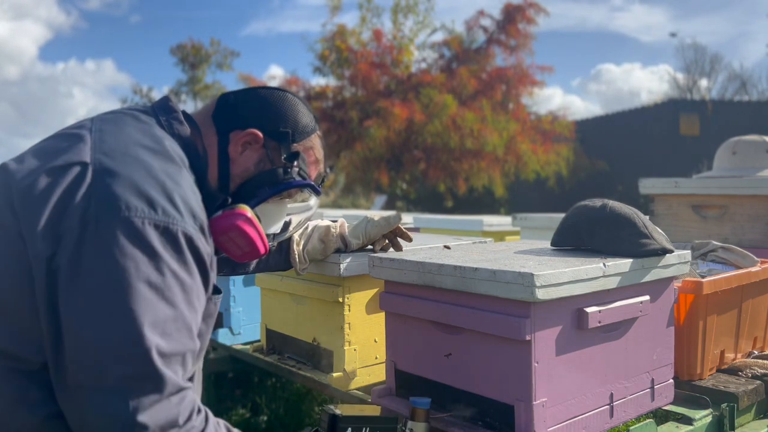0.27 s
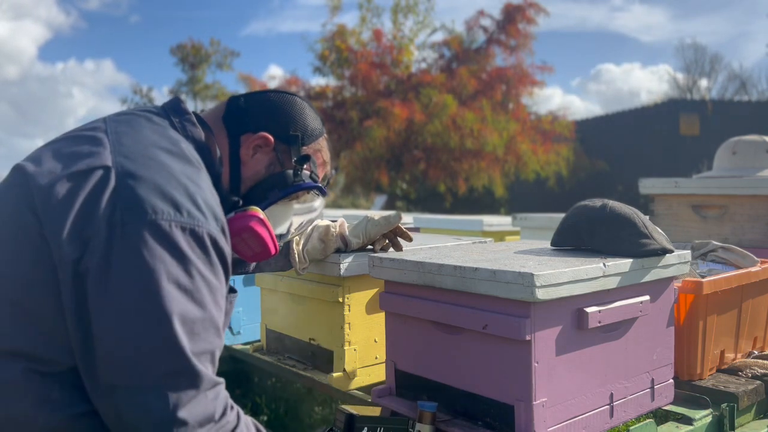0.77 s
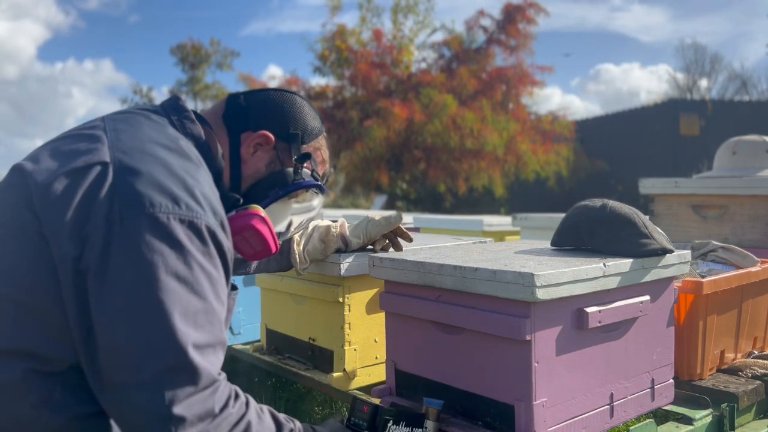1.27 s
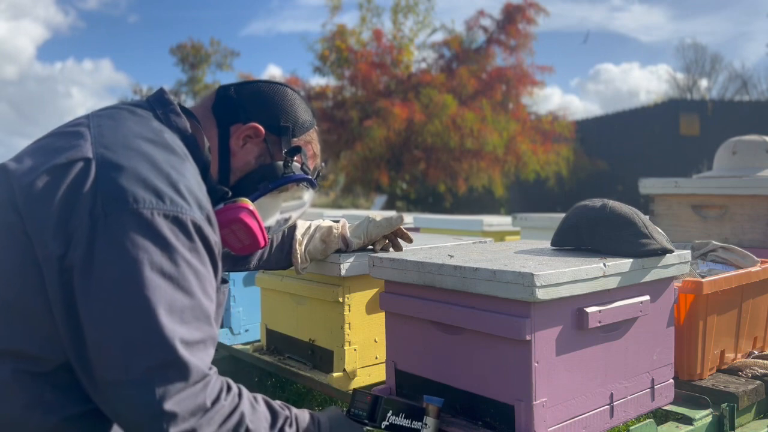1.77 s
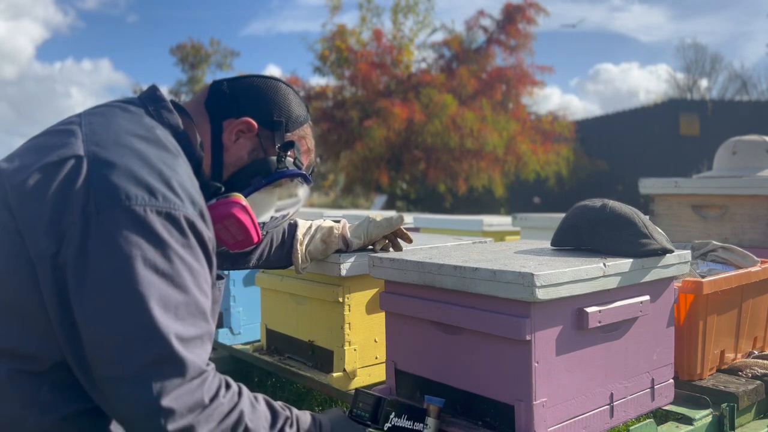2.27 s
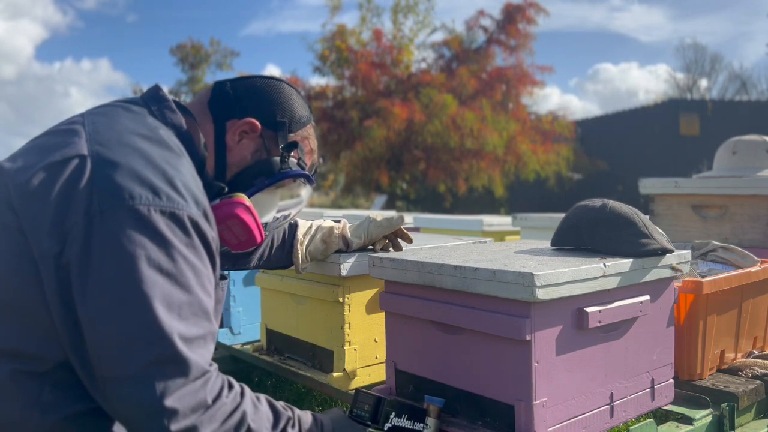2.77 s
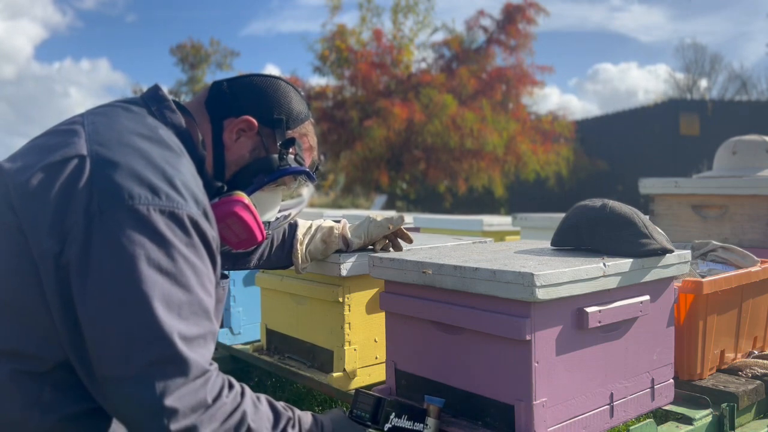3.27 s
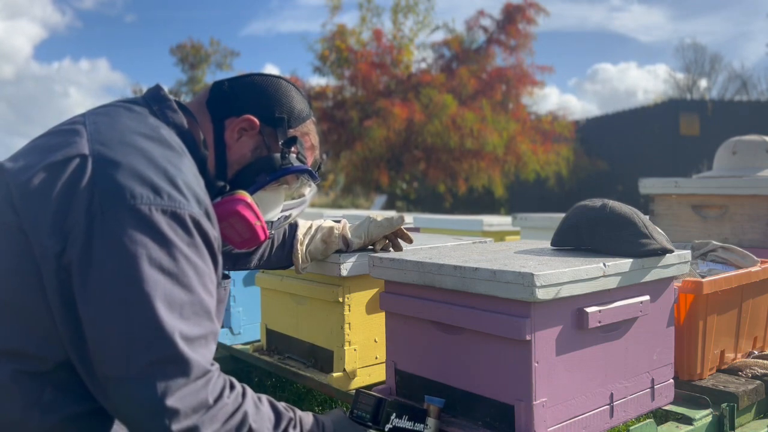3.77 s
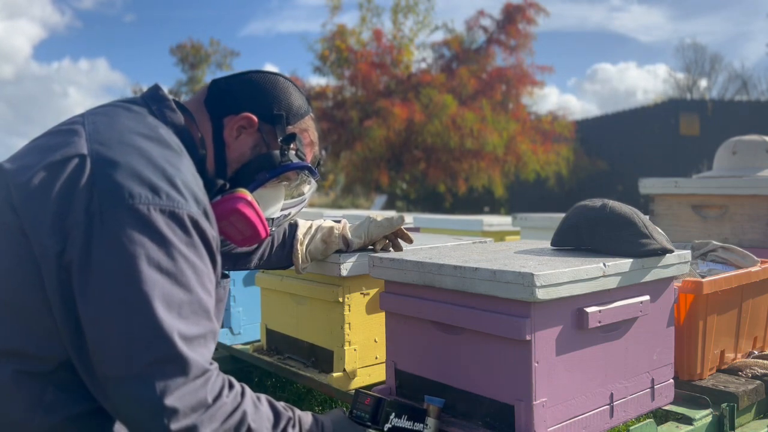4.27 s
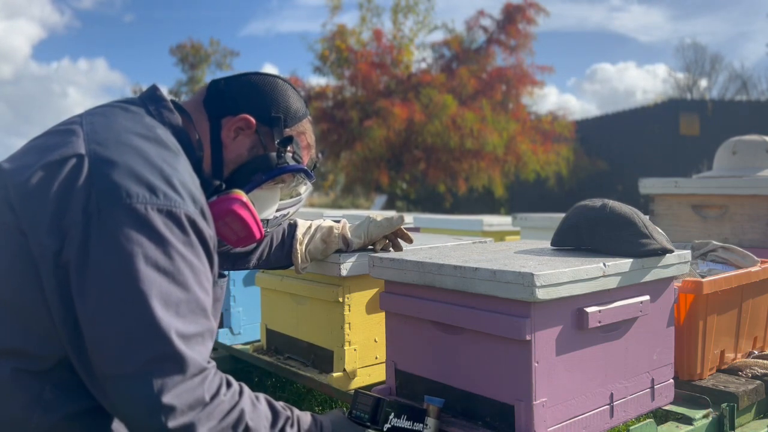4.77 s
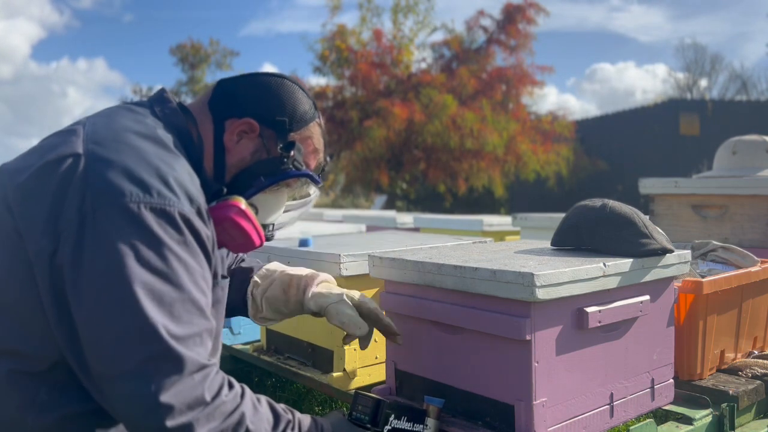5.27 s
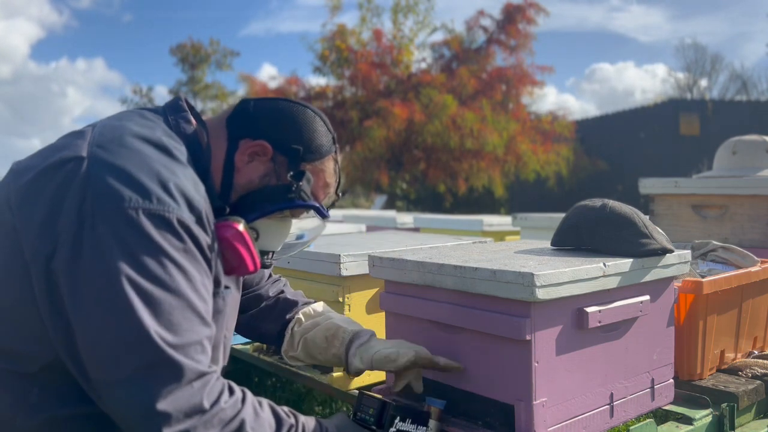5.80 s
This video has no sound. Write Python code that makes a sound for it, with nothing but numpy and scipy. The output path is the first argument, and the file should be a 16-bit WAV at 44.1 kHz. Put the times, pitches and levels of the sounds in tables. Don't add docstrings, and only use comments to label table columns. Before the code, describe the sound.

Bees hum low and waver among wooden hives while a cricket trills, a bird whistles, and hard hollow knocks hit a box near the end.

```python
import sys
import numpy as np
from scipy import signal
from scipy.fft import rfft, irfft, next_fast_len
from scipy.io import wavfile

SR = 44100
rng = np.random.default_rng(int(sys.argv[2]) if len(sys.argv) > 2 else 0)


def magnitude_from_level(level_db):
    exponent = np.asarray(level_db, float) / 20
    return 10 ** exponent


def generate_wav(sig):
    pcm = np.round(np.clip(np.atleast_2d(sig).T, -1, 1) * 32767).astype(np.int16)
    wavfile.write(sys.argv[1], SR, pcm)


N = 266231
T = np.arange(N) / SR

# frequency in Hz, level in dB, 60 dB decay in seconds.
LID_MODES = [(165.7, -8, 0.32), (270, 16, 0.018), (346, 6, 0.061), (420, -5, 0.083), (595, -5, 0.048),
             (975, -1.5, 0.03), (1700, -29, 0.018), (2300, -4.5, 0.0097)]
WALL_MODES = [(165.3, -11, 0.2), (239, 0.5, 0.06), (315.5, -15.5, 0.14), (456, -2.5, 0.035),
              (572, 8, 0.018), (773, -0.5, 0.017), (1080, 2, 0.012), (1393, 5, 0.013), (1840, -6, 0.009),
              (2400, 12, 0.0024), (4100, -0.5, 0.0081)]
FRONT_MODES = [(164, -12.5, 0.12), (242, -2, 0.062), (328, -11, 0.075), (487, -9, 0.014), (767, -8, 0.023),
               (1135, -9, 0.032), (1320, 12.5, 0.0085), (1780, 9.5, 0.007), (2284, -12, 0.021),
               (2590, -14, 0.017), (582, -12, 0.04)]
# start in seconds, level in dB, crack in dB, contact in ms, rattle in dB.
LID_BLOWS = [
    (.7615, -37, -42, 0.7, -5.5),
    (.766, -30, -50, 0.49, -11),
]
WALL_BLOWS = [
    (5.589, -47, -5, 1, 6.5),
    (5.6165, -29.5, -6, 0.6, 5),
    (5.619, -18.5, -15.5, 0.071, -9),
    (5.6225, -41, 5, 0.15, -18),
    (5.757, -34, -20, 0.85, -3.5),
]
FRONT_BLOWS = [
    (5.8338, -12, -15, 0.33, -9.5),
    (5.8448, -34.5, 3, 0.26, -22),
]
# start in seconds, end in seconds, level in dB, centre in Hz, grit in dB.
SCUFFS = [
    (5.57, 5.609, -66, 1190, 8),
    (5.723, 5.776, -55, 1300, -30),
    (5.791, 5.833, -46.5, 1380, -29),
    (5.808, 5.825, -54, 2200, 7),
    (5.663, 5.704, -53.5, 1130, -16),
    (5.851, 5.96, -59.5, 1250, -10),
]
# middle in seconds, level in dB, pitch in Hz, length in seconds.
TAPS = [
    (0.166, -55, 700, 0.0091),
    (0.243, -53.5, 676, 0.032),
    (0.789, -49, 355, 0.0089),
    (0.821, -43, 320, 0.015),
    (0.805, -58, 1670, 0.022),
    (1.199, -47, 420, 0.026),
    (1.206, -49, 260, 0.033),
    (1.381, -44, 267, 0.044),
    (5.768, -40.5, 617, 0.025),
]
# time in seconds, effort in dB.
EFFORT = [(0.0, -8.5), (0.6, -3.5), (1.7, -8), (2.3, 4.5), (2.8, -3), (3.7, 1.5), (4.15, 5.5), (4.6, -5),
          (5.0, 13.5), (5.4, -10.5), (6.04, -14.5)]
# wing beat in Hz, spread as a share, levels of overtones 1 to 3 in dB.
FLYING = [
    (203, .035, -8, -4, -22),
    (240, .05, -8, -16, -26),
]
# time in seconds, level in dB.
CRICKET_LEVEL = [(0.0, -66.5), (0.82, -66), (1.8, -64), (2.5, -63.5), (4.62, -66.5), (6.04, -66)]
# centre in Hz, width in Hz, level in dB.
CRICKET_WING = [(6760, 1600, 3), (6950, 180, -2.5), (6500, 260, -3)]
# start in seconds, length in seconds, first Hz, last Hz, level in dB.
WHISTLES = [(0.336, .02, 2320, 2150, -64), (1.372, .062, 2660, 2150, -61), (1.448, .03, 2740, 2620, -63),
            (1.565, .125, 2540, 2290, -61), (1.7, .024, 2800, 2500, -63), (1.912, .074, 2270, 2120, -61.5),
            (4.76, .036, 2330, 2110, -64), (0.377, .023, 3860, 3800, -73), (0.814, .02, 3800, 3780, -75),
            (1.787, .022, 3800, 3600, -72), (2.362, .022, 3900, 3630, -72.5)]
# start in seconds, spacing in seconds, number of sweeps.
TRILL = [
    (2.395, .0155, 4),
    (2.459, .0182, 7),
    (2.592, .018, 1),
    (2.615, .0179, 6),
    (2.727, .018, 1),
]
# time in seconds, level in dB.
RUMBLE = [(0.0, -56.5), (1.1, -48.5), (1.6, -59.5), (2.15, -48.5), (3.0, -52.5), (4.0, -54.5), (4.8, -62),
          (5.5, -57.5), (6.04, -37)]
# frequency in Hz, dB per Hz.
AIR_MID = [(22, -35), (34, -18), (48, -4), (70, -0.5), (110, -4), (160, -11.5), (420, -15.5), (560, -22),
           (1500, -27), (2700, -33.5), (5400, -35.5), (9000, -45), (12000, -58), (16000, -50.5)]
AIR_SIDE = [(15, -43), (25, -10), (102, -4.5), (285, -12.5), (405, -7), (1560, -14), (3920, -23),
            (6920, -22.5), (8360, -35), (10700, -35.5), (11900, -45), (14400, -37.5), (16000, -36)]
# low edge in Hz, high edge in Hz.
MID_GAPS = [(9700, 10950), (13050, 14450), (15750, 22050)]
SIDE_GAPS = [(10950, 13050), (14450, 22050)]


def walk(rate):
    knots = rng.standard_normal(int(rate * N / SR) + 3)
    step, share = np.divmod(T * rate, 1)
    step = step.astype(int)
    share = share ** 2 * (3 - 2 * share)
    return 1.15 * (knots[step] * (1 - share) + knots[step + 1] * share)


def unit(x):
    return x / np.sqrt(np.mean(x ** 2))


def resonate(x, hz, width):
    return signal.lfilter(*signal.iirpeak(hz, hz / width, fs=SR), x)


def butter(x, order, hz, kind="lowpass"):
    return signal.sosfilt(signal.butter(order, hz, kind, fs=SR, output="sos"), x)


def curve(table):
    return np.interp(T, *np.transpose(table))


def tone(hz):
    return np.sin(2 * np.pi * np.cumsum(hz) / SR)


def place(x, pan_db, lag):
    return np.array([np.roll(x, int(lag)) * magnitude_from_level(pan_db / 2), x * magnitude_from_level(-pan_db / 2)])


def board_ring(modes, late_s, contact_ms, t):
    ring = 0
    for k, (hz, db, t60) in enumerate(modes):
        u = np.clip(t - late_s * 200 / hz, 0, None)
        decay = np.exp(-np.log(1000) * u / t60)
        build_up = 1 - np.exp(-.9 * hz * u)
        ring = ring + (-1) ** k * magnitude_from_level(db) * np.sin(2 * np.pi * hz * u) * decay * build_up
    push = np.exp(-t[:300] / (contact_ms * 1e-3 / 4))
    return signal.fftconvolve(ring, push / push.sum())[:len(t)]


def knocks(blows, modes, late_s, pan_db):
    out, t = np.zeros((2, N + SR)), T[:SR // 5]
    for start, db, crack_db, contact_ms, rattle_db in blows:
        ring = board_ring(modes, late_s, contact_ms, t)
        grit = rng.standard_normal((4, len(t)))
        rattle = resonate(resonate(resonate(grit[3], 570, 890), 670, 2600), 680, 3300)
        rattle = 3 * rattle * np.exp(-t / 0.011)
        fade = np.exp(-(t / .003) ** 1.5) + magnitude_from_level(-36) * np.exp(-t / .03)
        crack = resonate(.7 * grit[0] + grit[1:3], 5500, 10000) * fade
        blow = place(ring + magnitude_from_level(rattle_db) * rattle, pan_db, 2.4) + magnitude_from_level(crack_db) * crack
        i = int(start * SR)
        out[:, i:i + len(t)] += magnitude_from_level(db) * blow
    return butter(out[:, :N], 4, [140, 15800], "bandpass")


def scuffs():
    out, grain = np.zeros((2, N)), magnitude_from_level(1.6 * walk(390))
    for start, end, db, hz, grit_db in SCUFFS:
        i, n = int(start * SR), int((end - start) * SR)
        noise = rng.standard_normal((3, n))
        body = resonate(resonate(noise[0], hz, 0.77 * hz), hz, 3 * hz)
        rub = place(unit(body), -.5, 3.4) + magnitude_from_level(grit_db) * resonate(noise[1:], 6000, 8000)
        out[:, i:i + n] += magnitude_from_level(db) * np.hanning(n) * rub
    return out * grain


def taps():
    out, u = np.zeros(N), T[:6000] - T[3000]
    for start, db, hz, span in TAPS:
        i = int(start * SR) - 3000
        swell = np.exp(-(u / (0.23 * span)) ** 2)
        out[i:i + len(u)] += magnitude_from_level(db) * swell * np.sin(2 * np.pi * hz * u)
    return place(out, 2.0, 0)


def wingbeat(hz, spread):
    return 2 * np.pi * np.cumsum(hz * (1 + spread * walk(1.6) + 0.69 * spread * walk(20))) / SR


def bees(count=3):
    effort_db = curve(EFFORT)
    fan_db, third_db = -62.5 + effort_db, -64 + 0.2 * effort_db
    fly_db = -70 - 0.71 * effort_db
    out = 0
    for _ in range(count):
        phase = wingbeat(106, .02)
        wing = magnitude_from_level(fan_db) * np.sin(phase) + magnitude_from_level(third_db) * np.sin(3 * phase)
        out = out + place(wing * magnitude_from_level(1.72 * walk(10)), 2.9, 0)
        for hz, spread, *overtones in FLYING:
            phase = wingbeat(hz, spread)
            wing = sum(magnitude_from_level(db) * np.sin((k + 1) * phase) for k, db in enumerate(overtones))
            out = out + place(wing * magnitude_from_level(fly_db + 3.4 * walk(8)), 1.2 + 2.3 * walk(1), 0)
    return out * np.sqrt(2 / count)


def cricket():
    strokes_hz = 61.5 * (1 + 0.0076 * walk(6.3))
    turn = np.cumsum(strokes_hz) / SR % 1
    chirp = tone(7000 - 1050 * (turn - .5) + 120 * walk(40))
    roughness = (2.1 + walk(500)) * magnitude_from_level(2.6 * walk(6.7))
    near = unit(np.sin(np.pi * turn) ** 2 * chirp * roughness)
    rasp = rng.standard_normal((2, N))
    far = unit(sum(magnitude_from_level(db) * resonate(resonate(rasp, hz, width), hz, width) for hz, width, db in CRICKET_WING))
    song = magnitude_from_level(-8.5) * place(near, 17.0, -16) + far * magnitude_from_level([[1.5], [-7]])
    return butter(magnitude_from_level(curve(CRICKET_LEVEL)) * song, 8, 9000)


def whistles(waver):
    song = np.zeros(N)
    attack_s, release_s, hook_s, hook_hz = .008, .005, .012, 110
    for start, span, first_hz, last_hz, db in WHISTLES:
        left_s = start + span - T
        done = np.clip((T - start) / span, 0, 1)
        edge = np.clip(np.minimum((T - start) / attack_s, left_s / release_s) + .5, 0, 1)
        hook = hook_hz * np.clip(1 - left_s / hook_s, 0, 1) * (span > .07)
        hz = first_hz + (last_hz - first_hz) * done ** 0.92 + hook + 28 * waver
        song += edge * magnitude_from_level(db - 5 * (1 - done)) * tone(hz)
    return song


def trill(waver):
    song, u = np.zeros(N), T[:2000] - T[1000]
    peak_s, peak_db, top_hz, rise_hz_per_s = 2.65, -58, 2690, 42000
    for start, spacing, sweeps in TRILL:
        for s in start + spacing * np.arange(sweeps):
            i = int(s * SR) - 1000
            below_db = max(26 * (peak_s - s), 70 * (s - peak_s))
            half = .0075 - .0003 * below_db
            hz = top_hz - rise_hz_per_s * half - 2800 * max(s - peak_s, 0) + 50 * waver[i]
            size = magnitude_from_level(peak_db - below_db - 1.5 + 1.2 * waver[2 * i])
            sweep = np.sin(2 * np.pi * (hz + rise_hz_per_s / 2 * u) * u)
            song[i:i + len(u)] += size * np.exp(-(u / half) ** 4) * sweep
    return song


def bird():
    waver = walk(60)
    song = whistles(waver) + trill(waver)
    tail = rng.standard_normal((2, 4000)) * np.exp(-np.arange(4000) / 900)
    smear = signal.fftconvolve(song[None], tail, axes=1)[:, :N]
    return np.sqrt(2) * (place(song, 0.8, 0) + magnitude_from_level(-33) * smear)


def breeze(shape, gaps, flicker_db, bass_db):
    size = next_fast_len(N)
    f = np.fft.rfftfreq(size, 1 / SR)
    octave = np.log2(f + 1)
    hz, db = np.transpose(shape)
    colour = rfft(rng.standard_normal(size))
    colour = colour * magnitude_from_level(np.interp(octave, np.log2(hz), db, left=-90, right=-90))
    for low, high in gaps:
        colour = colour * ((f < low) | (f > high))
    out = 0
    for k in range(4, 15):
        band = irfft(colour * np.clip(1 - abs(octave - k), 0, 1), size)[:N]
        out = out + band * magnitude_from_level(flicker_db * walk(9) + bass_db * (k < 7))
    return unit(out)


def air():
    swell = curve(RUMBLE)
    swell = 0.4 * (swell - swell.mean())
    mid = magnitude_from_level(-53) * breeze(AIR_MID, MID_GAPS, flicker_db=0.8, bass_db=swell)
    side = magnitude_from_level(-62) * breeze(AIR_SIDE, SIDE_GAPS, flicker_db=-0.3, bass_db=swell)
    side = side + 0.1 * butter(mid, 2, 500)
    return np.array([mid + side, mid - side])


def scene():
    work = knocks(LID_BLOWS, LID_MODES, late_s=0.0052, pan_db=1.9)
    work = work + knocks(WALL_BLOWS, WALL_MODES, late_s=0.00465, pan_db=-0.97)
    work = work + knocks(FRONT_BLOWS, FRONT_MODES, late_s=0.00824, pan_db=-0.49)
    return work + scuffs() + taps() + bees() + cricket() + bird() + air()


def low_pass(x):
    return signal.sosfilt(signal.butter(12, 17010, fs=SR, output="sos"), x)


def record(dry):
    rounded = np.tanh(1.832 * dry) / 1.766
    top_cut = signal.ellip(6, .3, 60, 16300, fs=SR, output="sos")
    mix = signal.sosfilt(top_cut, rounded)
    return low_pass(mix)


dry = scene()
out = record(dry)
generate_wav(out)
```